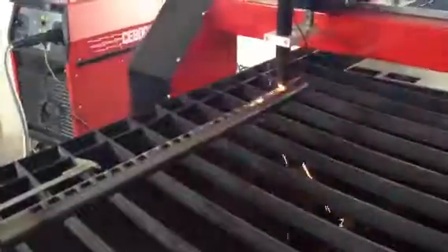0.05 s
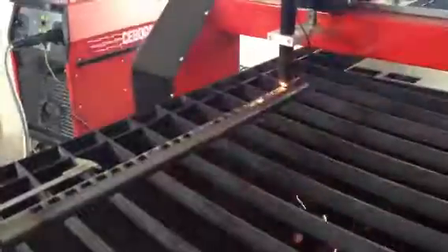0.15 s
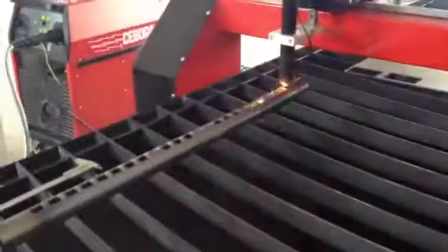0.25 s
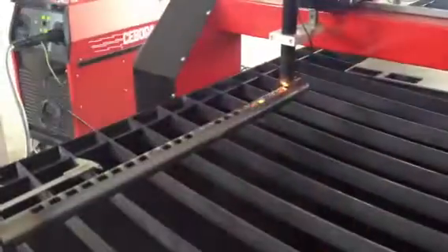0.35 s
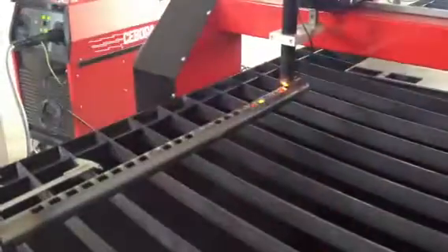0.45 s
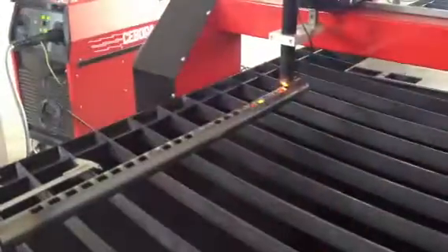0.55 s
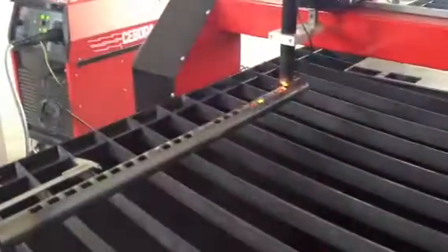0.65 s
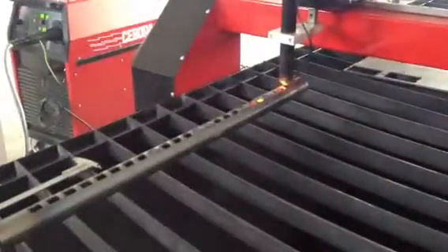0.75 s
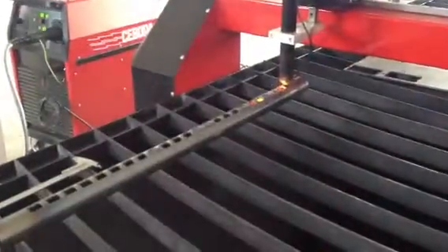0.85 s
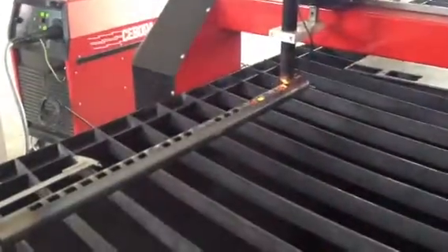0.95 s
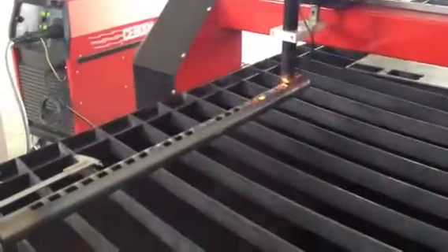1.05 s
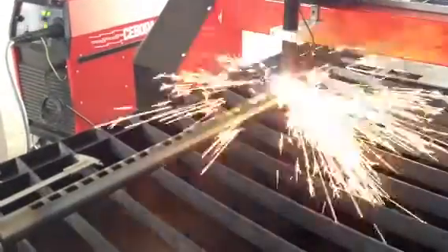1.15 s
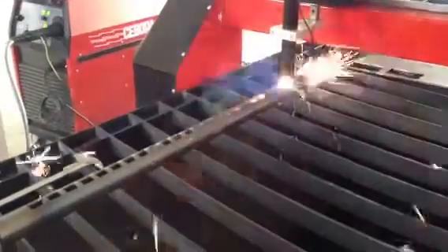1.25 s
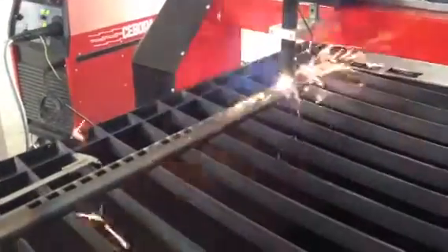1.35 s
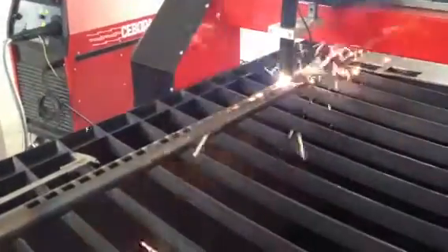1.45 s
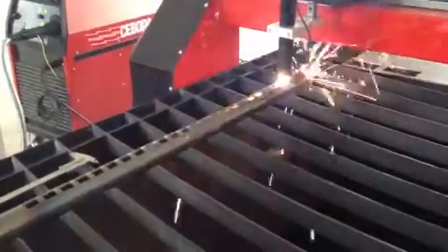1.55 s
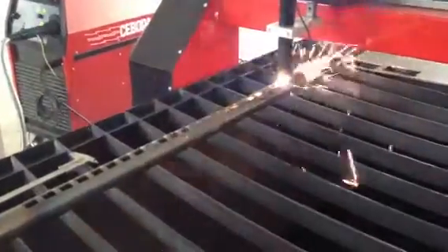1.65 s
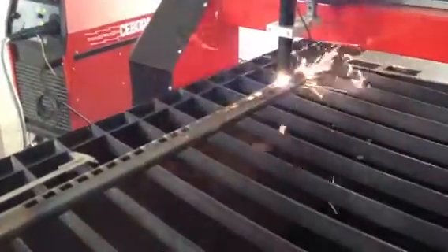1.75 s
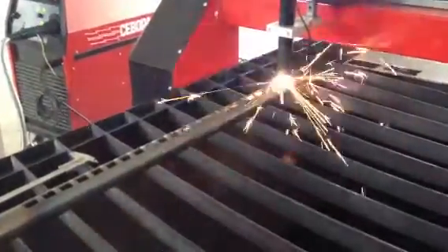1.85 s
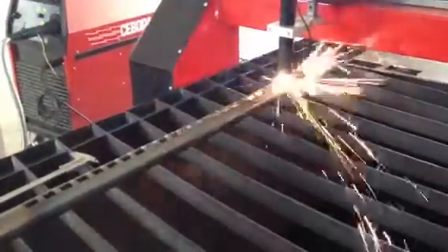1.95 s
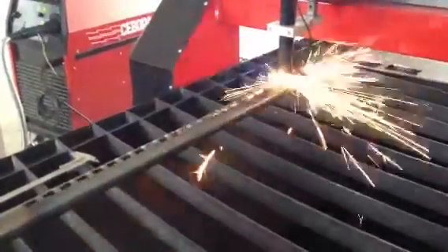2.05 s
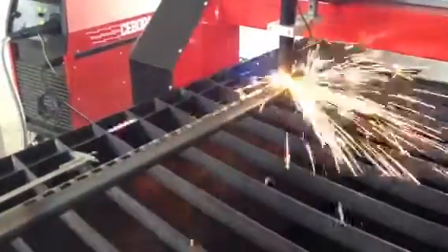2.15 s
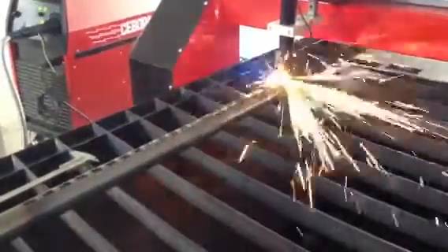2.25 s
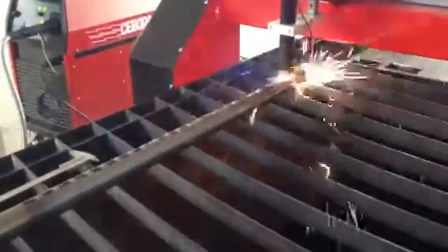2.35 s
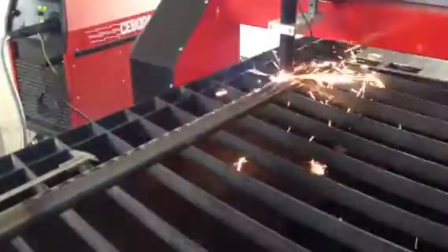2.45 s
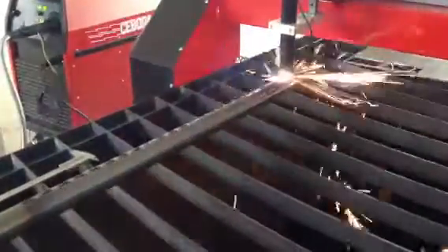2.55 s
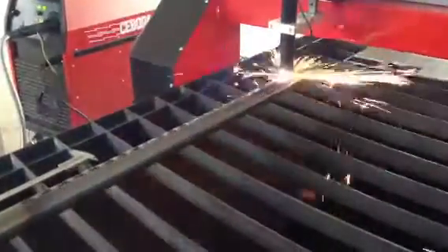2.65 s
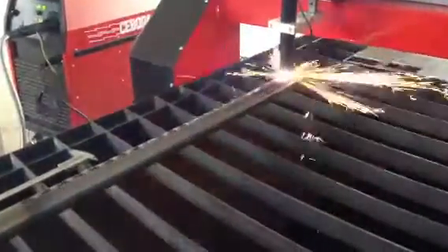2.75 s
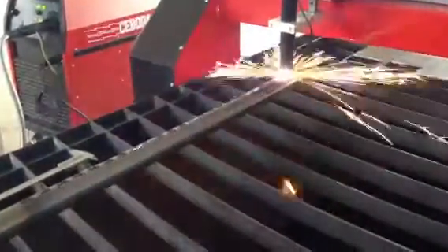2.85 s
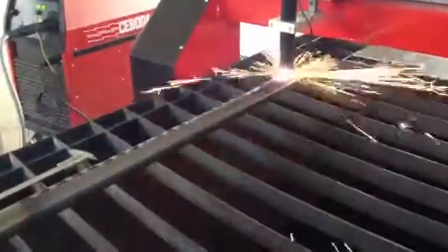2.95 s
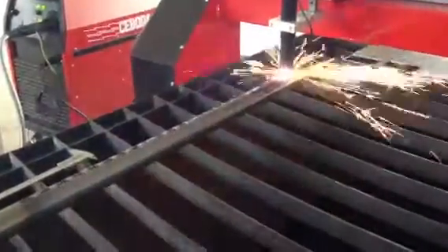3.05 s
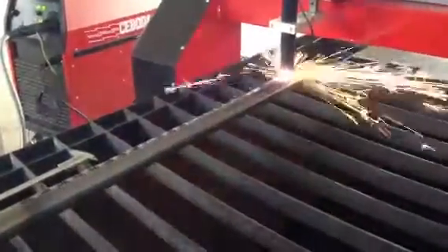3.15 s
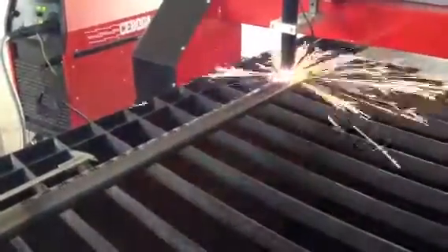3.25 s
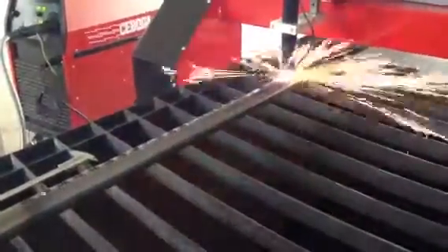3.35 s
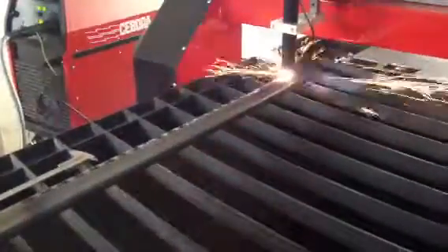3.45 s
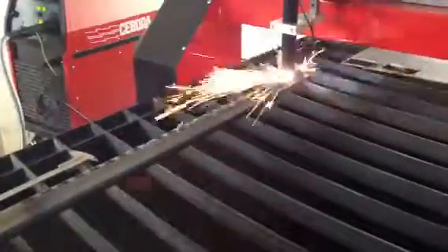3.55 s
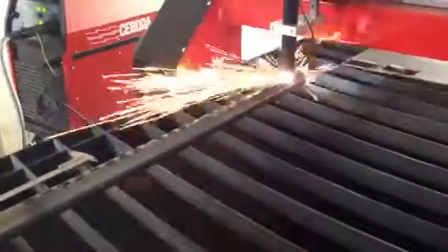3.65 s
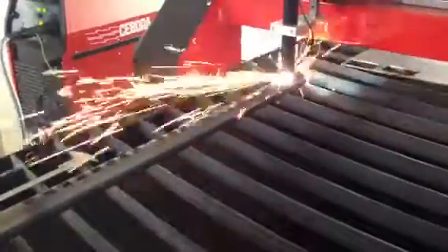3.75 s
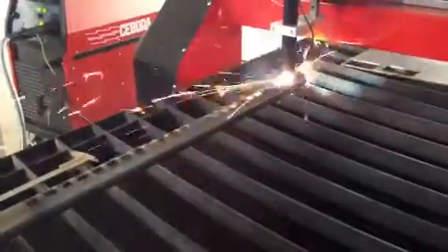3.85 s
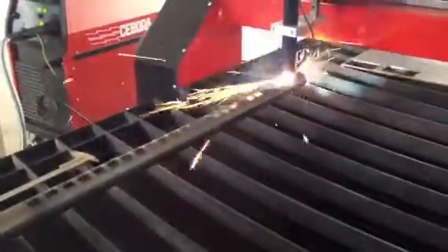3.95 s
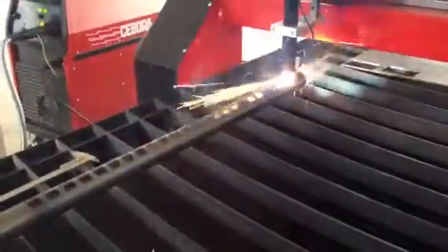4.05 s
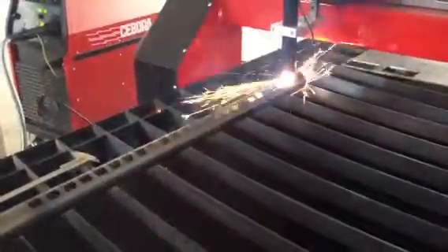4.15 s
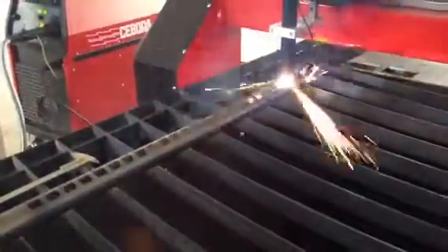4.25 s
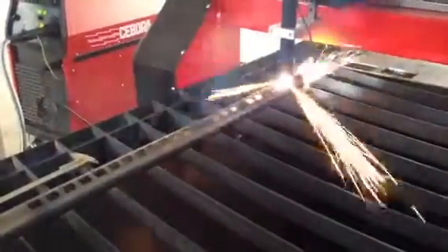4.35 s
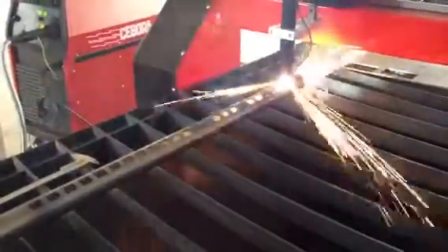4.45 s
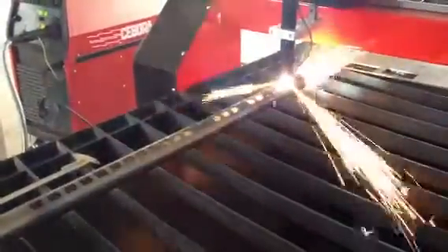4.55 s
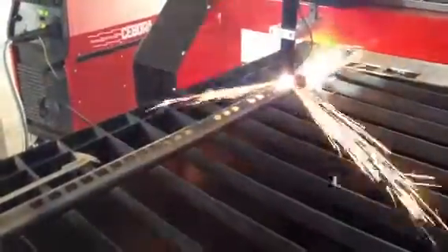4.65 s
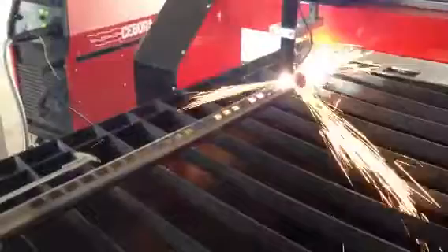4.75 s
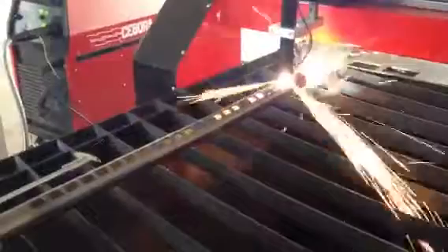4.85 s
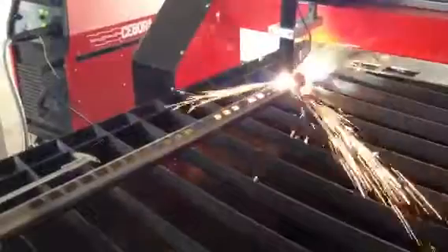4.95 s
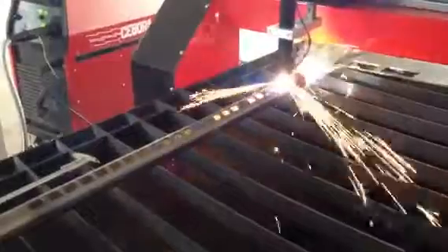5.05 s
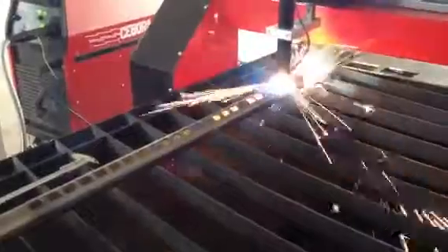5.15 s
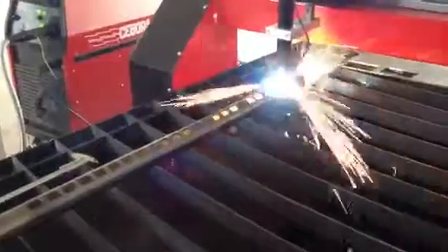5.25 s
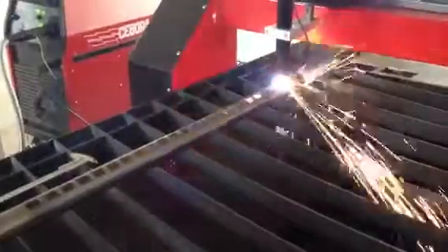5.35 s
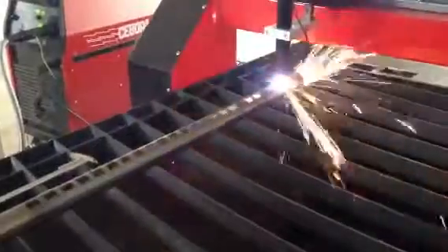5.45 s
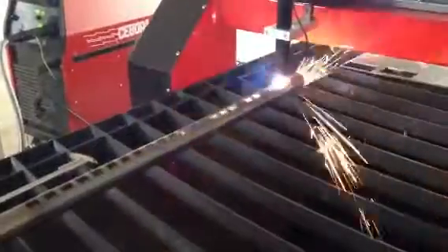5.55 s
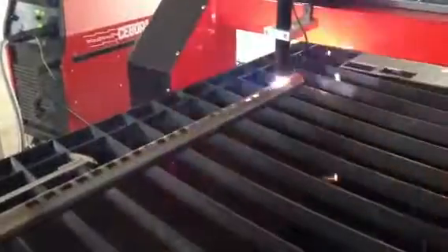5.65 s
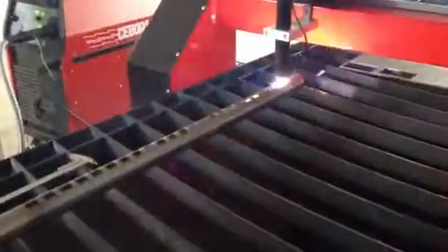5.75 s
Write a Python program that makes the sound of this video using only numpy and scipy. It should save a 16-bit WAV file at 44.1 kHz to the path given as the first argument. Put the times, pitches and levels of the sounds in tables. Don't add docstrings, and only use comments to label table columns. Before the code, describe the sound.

In a workshop, a plasma torch pauses over a steel bar. From 0 s, thin cooling air hisses, brightening over the first third of a second, while a midrange hum from the previous hole swells slightly and dies by about 0.6 s. Beneath are low room rumble and a compressor's pulsing throb with faint whine, slowly growing more audible. At about 1.16 s a very short falling chirp marks the arc strike, and the air is replaced abruptly by a much louder, harsh, broadband cutting hiss with a hollow, ringing roar around it. The sound sputters finely, with brief dips near 2, 2.8 and 4 s. Around 2.3 to 3.6 s it turns airier and brighter as the jet sprays free; afterwards the roar thickens, surging at the end without stopping. The close microphone is mostly mono, slightly gritty, with brief wide flecks of noise and clipped treble.

```python
import sys
import numpy as np
from scipy import signal
from scipy.fft import rfft, irfft
from scipy.io import wavfile
from scipy.ndimage import uniform_filter1d

SR = 44100
rng = np.random.default_rng(int(sys.argv[2]) if len(sys.argv) > 2 else 0)


def ratio(d):
    e = np.asarray(d, float) / 20
    return 10 ** e


def transcribe(u):
    v = np.clip(np.atleast_2d(u).T, -1, 1)
    q = np.round(v * 32767).astype(np.int16)
    wavfile.write(sys.argv[1], SR, q)


N = 256646
STRIKE_S = 1.162


def evened(x):
    return x / np.sqrt(np.mean(x ** 2) + 1e-20)


def read(points, hz):
    f, value = np.transpose(points)
    return np.interp(np.log(hz + 1), np.log(f + 1), value)


def lifted(modes, hz):
    return sum(db / (1 + (2 * (hz - f) / width) ** 2) for f, width, db in modes)


def drift(shape, *spans):
    x = rng.standard_normal(shape)
    for axis, span in enumerate(spans):
        x = uniform_filter1d(x, span, axis)
        x = uniform_filter1d(x, span, axis)
    return evened(x)


def gate(s, rise):
    return np.clip((np.arange(N) / SR - s) / rise, 0, 1)


def hiss(rows, edges, colour_db, blur_hz, patchy_db, stripes_db, ring=(0, 1), size=1024):
    hop = size // 4
    hz = np.fft.rfftfreq(size, 1 / SR)
    t = np.arange(4 * N // size + 5) * hop / SR
    s, *columns = np.transpose(rows)
    shape = ratio(2 * colour_db(hz))
    above = [1 / (1 + np.exp((edge - hz) / blur_hz)) for edge in edges[1:-1]]
    lower, upper = [1] + above, above + [0]
    power = 0
    for k in range(len(edges) - 1):
        band = (lower[k] - upper[k]) * shape
        total = band[(hz >= edges[0]) & (hz < edges[-1])].sum()
        power = power + np.outer(ratio(2 * np.interp(t, s, columns[k])), band / total)
    field_db = patchy_db * drift(power.shape, 10, 5) + stripes_db * drift(power.shape, 50, 2)
    ring_hz = np.interp(t, s, columns[-1])[:, None]
    field_db = field_db + lifted([(ring_hz, ring[1], ring[0])], hz)
    real, imaginary = rng.standard_normal((*power.shape, 2)).T
    spectra = (real + 1j * imaginary) * (np.sqrt(power) * ratio(field_db)).T
    noise = signal.istft(spectra, nperseg=size, noverlap=size - hop)[1][:N]
    return np.sqrt(3 / 2) * noise


def air():
    # t/s, level/dB
    course = [
        (0, -32.5),
        (.1, -35),
        (.4, -35),
        (.8, -35.5),
        (1.155, -33.5),
    ]
    # f/Hz, level/dB per Hz
    colour = [(1180, -26), (2000, -13), (2090, -9), (2370, -8), (2630, -18.5), (3190, -7.5), (3540, -11),
              (4120, -7), (5020, -10), (6590, 3.5), (9740, -3), (13900, -3.5), (15300, -12)]
    nozzle_hz = 4600
    s = np.arange(0, STRIKE_S, .01)
    low_db = np.interp(s, *np.transpose(course))
    filling = np.clip((s - .1) / .22, 0, 1)
    high_db = low_db + 1.9 + 7.5 * filling
    rows = np.c_[s, low_db, high_db, nozzle_hz + 0 * s]
    x = hiss(rows, (2600, 5100, 15300), lambda hz: read(colour, hz), 130,
             patchy_db=0.25, stripes_db=1.5, ring=(3.5, 450))
    return ratio(-1.2) * x * (1 - gate(STRIKE_S, 0.012))


def fading():
    # t/s, level/dB
    decay = [
        (0, -38),
        (.2, -37),
        (.35, -38),
        (.6, -60),
    ]
    return hiss(decay, (1100, 2200), lambda hz: lifted([(1606, 810, 33)], hz), 1,
                patchy_db=-3.0, stripes_db=1.5)


def cut():
    # t/s, level/dB
    power = [
        (1.18, 0.3),
        (1.6, 0.4),
        (2.4, 1.1),
        (3.2, -0.65),
        (4, 1.6),
        (4.6, 0.5),
        (5.2, 0.14),
        (5.79, 1.7),
    ]
    # t/s, change/dB, fall/s, recovery/s
    falters = [(1.37, -2, 0.069, 0.21), (1.87, -0.5, 0.1, 0.02), (1.96, -2.5, 0.033, 0.02),
               (2.17, -2.3, 0.08, 0.069), (2.6, -2, 0.063, 0.1), (2.79, -4.5, 0.064, 0.11),
               (3.17, 2.5, 0.18, 0.02), (3.61, -1, 0.16, 0.018), (3.96, -3, 0.02, 0.12),
               (4.1, -1.7, 0.02, 0.091), (4.26, -1.9, 0.1, 0.1), (5.08, -2.5, 0.031, 0.18),
               (5.55, -1.5, 0.12, 0.033)]
    # t/s, share/0-1
    spray = [(1.18, 0.7), (1.36, 0.09), (1.92, 0), (2.02, 0.24), (2.18, 0), (2.28, 0.42), (2.64, 0.99),
             (3.04, 0.72), (3.52, 0.8), (3.76, 0.46), (4.6, 0.11), (5.56, 0), (5.6, 0.23), (5.79, 0.55)]
    # t/s, share/0-1
    slag = [(1.18, 0.2), (1.32, 1.02), (1.64, 0.28), (1.96, 0.9), (2.0, 0.2), (2.26, 0.7), (2.98, 0.14),
            (3.06, 0.67), (3.42, 0.22), (3.58, 0.69), (4.14, 0.5), (4.24, 1.03), (4.4, 0.15), (5.79, 0.42)]
    # t/s, share/0-1
    height = [(1.18, 0.9), (1.28, 0.3), (1.6, 0.7), (2.2, 0.96), (2.24, 0.42), (3.52, 0.82), (3.9, 0.23),
              (4.34, 0.47), (4.66, 0), (5.02, 0.3), (5.32, 0.3), (5.58, 0.92), (5.64, 0), (5.79, 0)]
    hold_s, fade_s = 0.12, 0.078
    s = np.arange(0, N / SR, .005)
    arc_db = np.interp(s, *np.transpose(power))
    for at, db, fall, back in falters:
        arc_db = arc_db + np.interp(s, [at - fall, at, at + back], [0, db, 0])
    shares = [np.interp(s, *np.transpose(course)) for course in (spray, slag, height)]
    blow_back = np.clip(1 - (s - STRIKE_S - hold_s) / fade_s, 0, 1)
    return s, arc_db, np.array([s ** 0, *shares, blow_back])


def workshop_db(pace=1):
    start_db, rise_db_per_s, top_db = -38, 9, -31
    ducked_db, per_spray_db, per_arc, duck_s = -33, -4, .6, 0.12
    s, arc_db, state = cut()
    free = np.minimum(start_db + pace * rise_db_per_s * s, top_db)
    ducked = ducked_db + per_spray_db * state[1] + per_arc * arc_db
    return s, free + (ducked - free) * np.clip((s - STRIKE_S) / duck_s, 0, 1)


def shop():
    # f/Hz, level/dB per Hz
    colour = [(40, -55), (70, -49), (100, -24), (140, -10), (200, 0.5), (300, -4.5), (450, -5.5), (650, -3),
              (900, -4), (1200, -4), (1550, -6.5), (2350, -14), (2700, -10), (4000, -40)]
    # multiple of the stroke rate, level/dB rms
    compressor = [(6, -72), (7, -67), (8, -59), (10, -49), (12, -52), (15, -56), (16, -49), (18, -45),
                  (20, -46), (22, -54), (24, -54), (26, -52), (30, -52), (32, -57), (34, -52), (38, -52),
                  (40, -50), (42, -53), (50, -53), (51, -54), (52, -46), (53, -54), (56, -52), (57, -40),
                  (58, -42), (59, -51), (64, -53), (67, -55), (78, -50), (80, -40)]
    throb_db = (1.5, 0.4, 1.2)
    paces = (1.12, 1.9, 0.96)
    slopes, throb_at_db = (1.74, .75, 1.6), -33
    strokes_hz, stroke_s = 16.368, .406
    t = np.arange(N) / SR
    s, level_db = workshop_db()
    rumble = hiss(np.c_[s, level_db], (130, 800), lambda hz: read(colour, hz), 1,
                  patchy_db=0.16, stripes_db=-0.4, size=2048)
    swell = []
    for db, slope, pace in zip(throb_db, slopes, paces):
        gain_db = np.interp(t, *workshop_db(pace))
        swell.append(ratio(db + slope * (gain_db - throb_at_db)))
    turn = 2 * np.pi * strokes_hz * (t - stroke_s)
    waver_db = 1.1 * drift((60, len(compressor)), 3).T
    orders = 0
    for (k, db), wavering in zip(compressor, waver_db):
        waver = ratio(np.interp(t, np.linspace(0, t[-1], 60), wavering))
        group = (k > 44) + (k > 70)
        phase = .21 * (k - 57.5) ** 2
        orders = orders + waver * swell[group] * ratio(db) * np.cos(k * turn + phase)
    return ratio(-3.7) * rumble + ratio(3.3) * orders


def strike():
    t = np.arange(400) / SR
    phase = 2 * np.pi * np.cumsum(4800 - 200000 * t) / SR
    chirp = np.sin(phase) * np.exp(-((t - .004) / 0.0037) ** 2)
    padded = np.r_[ratio(-10.5) * chirp, np.zeros(N - len(t))]
    return np.roll(padded, round((STRIKE_S + .002) * SR))


def slot():
    # f/Hz, level/dB per Hz
    envelope = [(240, -67), (400, -25.5), (639, -12), (886, -10.5), (956, -10), (1070, -11.5), (1270, -8.5),
                (1860, -5), (2070, -4), (2750, -4.5), (3070, -4.5), (4590, -3), (5400, -8), (7020, -28.5),
                (11900, -120)]
    # f/Hz, width/Hz, lift/dB
    modes = [(1400, 110, 5), (1640, 60, 2), (1840, 140, 7), (2390, 100, 5), (2580, 60, 2), (3030, 130, 7),
             (3210, 110, 5), (3750, 200, 3), (4330, 60, 3), (4750, 130, 3), (5130, 250, -4)]
    # level/dB, then dB per full spray, slag, height, blow-back
    follows = [
        (-35.5, -1.7, 3.5, 4, -4),
        (-24, -9, 0.1, -2.4, -1.5),
        (-26.5, -3, -1.5, -0.8, -0.68),
        (-22.2, -3, -1.1, 0.55, 2.6),
    ]
    # f/Hz, then Hz per full spray, slag, height, blow-back
    ring_follows = (4569, -150, -38, -1, 58)
    # start t/s, end t/s, lip level/dB, ring level/dB
    sings = [
        (2.306, 2.73, -1.2, 1.5),
        (2.9, 3.46, 2, -0.8),
        (3.5, 3.62, -1.5, -0.3),
        (4.38, 4.95, 2.5, 0.5),
    ]
    s, arc_db, state = cut()
    sings_db = 0
    for start, end, *db in sings:
        inside = np.clip(np.minimum(s - start, end - s) / 0.032, 0, 1)
        sings_db = sings_db + np.outer([0, 0, *db], inside)
    levels_db = arc_db + sings_db + follows @ state
    rows = np.c_[s, levels_db.T, ring_follows @ state]
    return hiss(rows, (1000, 1616, 2606, 3325, 5670), lambda hz: read(envelope, hz) + lifted(modes, hz), 65,
                patchy_db=0.4, stripes_db=1.68, ring=(4., 400))


def jet():
    # f/Hz, level/dB per Hz
    envelope = [(2940, -35), (5000, -5), (5240, -5), (6170, -1), (7750, 0), (9840, -7), (11500, -5),
                (13500, -5), (14700, -7), (15200, -10)]
    # f/Hz, width/Hz, lift/dB
    modes = [(5830, 510, 2), (6180, 250, 1), (7020, 330, 0.5), (7370, 180, 0), (7670, 230, 0.5),
             (8230, 730, 2.5)]
    # level/dB, then dB per full spray, slag, height, blow-back
    follows = [
        (-19.5, 3.5, -5, -0.14, .3),
        (-30.5, 8, 2.3, 1.6, -.3),
        (-26, 4, 5.5, -6, .6),
        (-26.5, -1.9, 0.5, 5.5, 0.2),
    ]
    # f/Hz, then Hz per full spray, slag, height, blow-back
    whistle_follows = (6900, 548, -600, 400, -500)
    s, arc_db, state = cut()
    levels_db = arc_db + follows @ state
    rows = np.c_[s, levels_db.T, whistle_follows @ state]
    return hiss(rows, (5130, 8730, 10850, 12580, 15200), lambda hz: read(envelope, hz) + lifted(modes, hz), 180,
                patchy_db=0.8, stripes_db=1.3, ring=(3.5, 1300))


def scene():
    sputter = ratio(.8 * drift(N, 40) + 0.16 * drift(N, 600))
    arc = (ratio(-0.08) * slot() + ratio(-0.1) * jet()) * sputter * gate(STRIKE_S, 0.0066)
    mono = air() + fading() + shop() + strike() + arc
    return np.array([mono, mono])


def rounded_lines(x):
    # f/Hz, level/dB over the neighbouring lines
    coarse = [(100, -40), (400, -26), (2500, -12), (5200, -1), (7500, 0), (10000, 3), (13000, 4),
              (15000, 4.5)]
    n, k = np.arange(2048)[:, None], np.arange(1024)
    window = np.sin(np.pi * (n + .5) / 2048)
    basis = window * np.cos(np.pi / 1024 * (n + 512.5) * (k + .5)) / np.sqrt(512)
    blocks = np.pad(x, (1024, 2048 - N % 1024)).reshape(-1, 1024)
    lines = np.hstack([blocks[:-1], blocks[1:]]) @ basis
    nearby = np.sqrt(abs(uniform_filter1d(lines ** 2, size=90, axis=1))) + 1e-9
    whim_db = 2.2 * np.repeat(drift((len(lines), 128), 2), 8, axis=1)
    step = nearby * ratio(read(coarse, (k + .5) * SR / 2048) + whim_db)
    rounded = np.sign(lines) * np.floor(abs(lines) / step + .4) * step
    back = rounded @ basis.T
    return (back[:-1, 1024:] + back[1:, :1024]).ravel()[:N]


def wide_bursts():
    # t/s, low f/Hz, high f/Hz, level/dB
    fills = [(.447, 10300, 11800, -41), (1.032, 4200, 5250, -38), (1.032, 8300, 9730, -38),
             (1.938, 5170, 6370, -31), (1.938, 6900, 9040, -29), (2.171, 4200, 6300, -27),
             (2.171, 9650, 11750, -30), (2.402, 12400, 13850, -31), (2.475, 4650, 6300, -27),
             (3.077, 6250, 8350, -23), (4.122, 5600, 6950, -27), (4.705, 4200, 5200, -28),
             (5.03, 4200, 5200, -28), (5.77, 6250, 7650, -26)]
    side, hz = np.zeros(N + 2048), np.fft.rfftfreq(2048, 1 / SR)
    window = np.sin(np.pi * np.arange(2048) / 2048)
    for s, low_hz, high_hz, db in fills:
        band = (hz > low_hz) & (hz < high_hz)
        burst = irfft(rfft(rng.standard_normal(2048)) * band)
        side[round(s * SR) - 1024:][:2048] += ratio(db) * evened(burst) * window
    return np.array([side[:N], -side[:N]])


def roll_off(x):
    return signal.sosfilt(signal.butter(12, 15940, fs=SR, output="sos"), x)


def record(dry):
    x = rounded_lines(.9 * np.tanh(dry[0] / .9))
    low_pass = signal.firwin(1023, 15290, window=("kaiser", 12), fs=SR)
    x = signal.oaconvolve(x, low_pass, "same")
    x = signal.sosfilt(signal.butter(3, 85, "high", fs=SR, output="sos"), x)
    return roll_off(x + wide_bursts())


dry = scene()
out = record(dry)
transcribe(out)
```